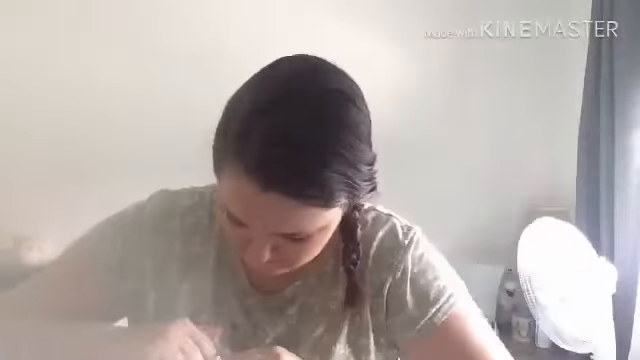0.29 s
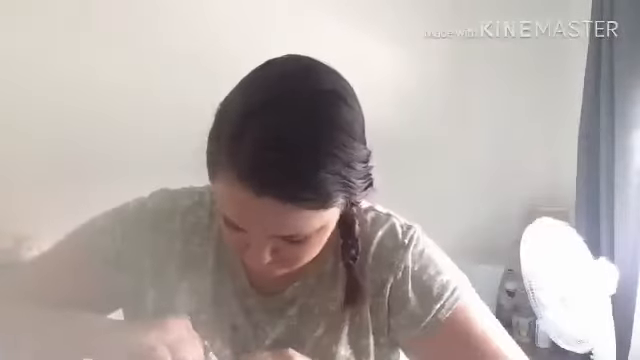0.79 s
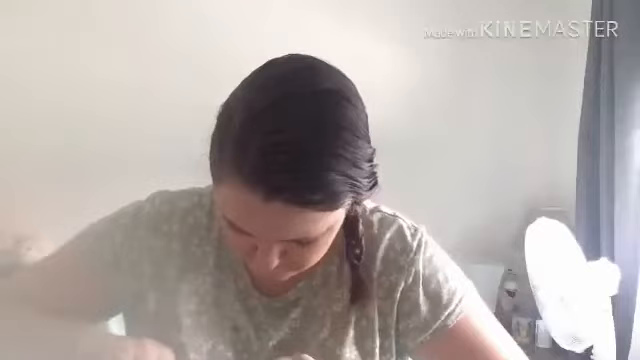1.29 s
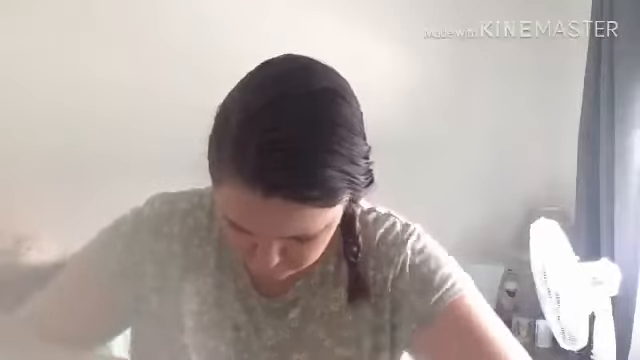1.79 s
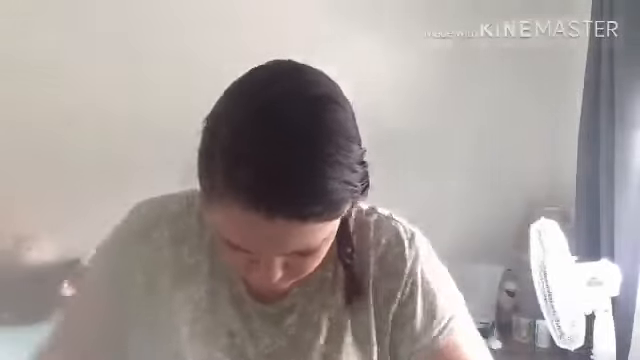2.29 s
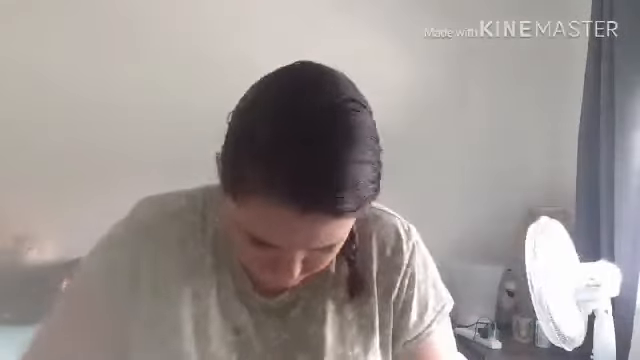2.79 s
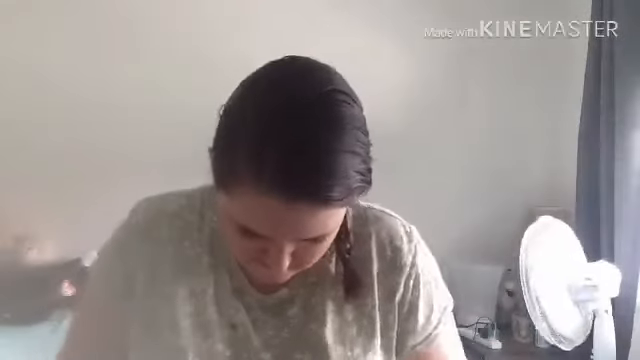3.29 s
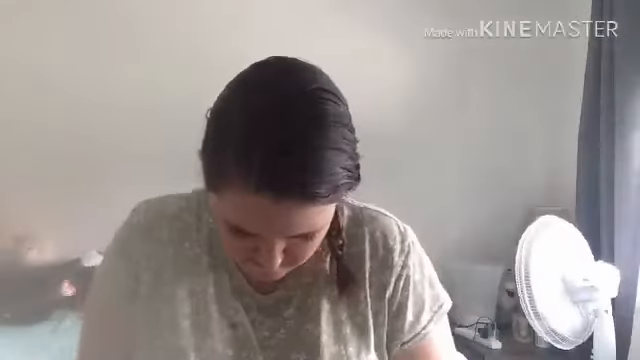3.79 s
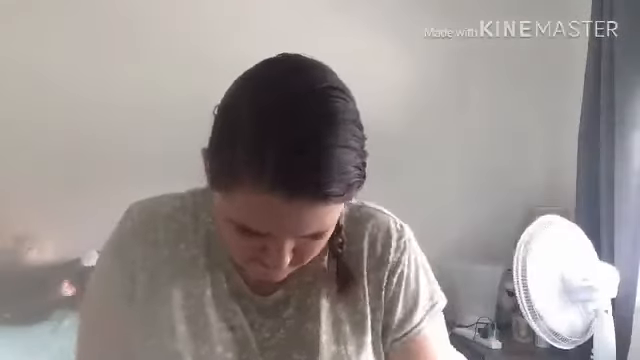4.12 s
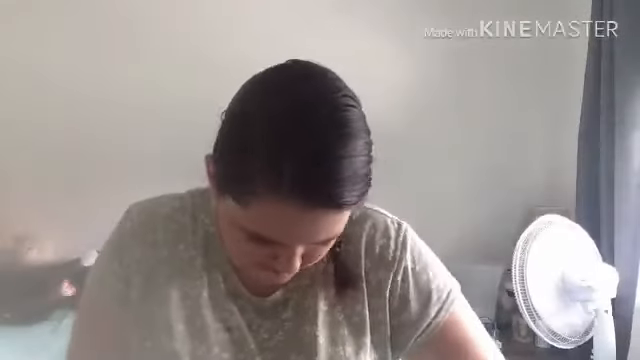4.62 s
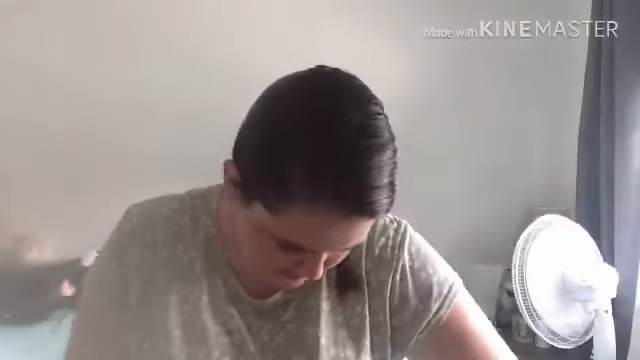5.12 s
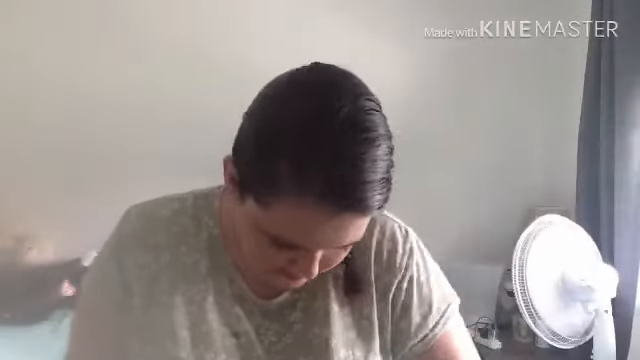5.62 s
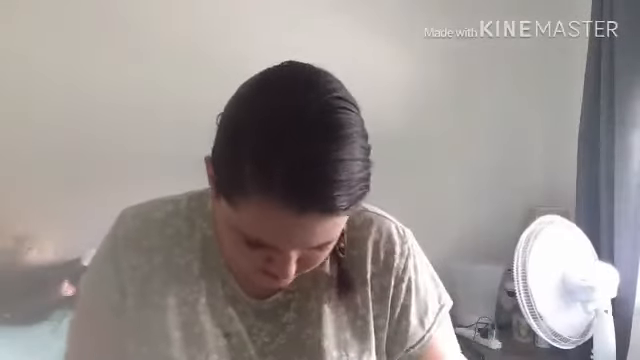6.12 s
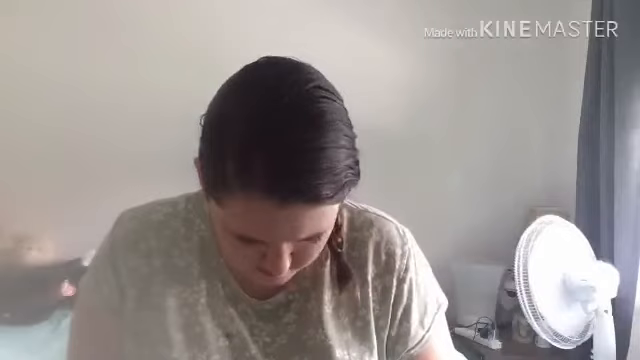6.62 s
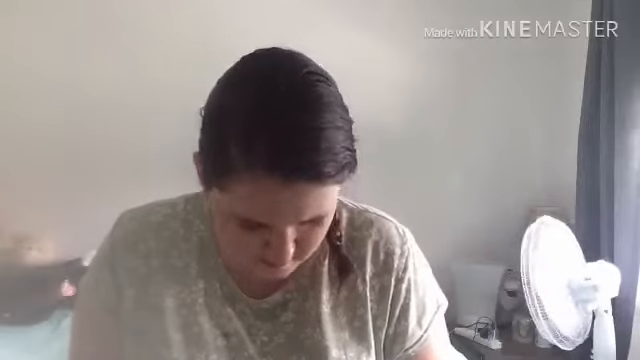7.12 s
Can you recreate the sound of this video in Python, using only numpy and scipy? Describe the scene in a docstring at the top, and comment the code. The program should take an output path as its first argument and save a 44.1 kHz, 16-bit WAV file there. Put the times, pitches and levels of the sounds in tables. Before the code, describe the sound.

Thin plastic film crackles and slides under busy hands, pops loudly once, then rustles more softly while a fan hums quietly in a small room.

```python
"""Opening a plastic mailing bag

Hands work the bag open in a small, quiet room, with an oscillating fan humming in the background.
The film slides and crinkles: coloured noise and many tiny clicks that ring at the pitch of its facets.
Creases snap through as short cracks with a thump and a tick, and once the taut bag gives way
with a loud pop of decaying sines. Sparse reflections from near walls surround the bag."""
import sys
import numpy as np
from scipy import signal
from scipy.fft import rfft, irfft
from scipy.io import wavfile

SR = 44100
rng = np.random.default_rng(int(sys.argv[2]) if len(sys.argv) > 2 else 0)


def master_out(mix):
    """Clip the mix to full scale and print it as 16-bit PCM to the path in sys.argv[1]."""
    frames = np.transpose(np.atleast_2d(mix))
    ceiling = np.clip(frames, -1, 1)
    pcm = np.round(ceiling * 32767).astype(np.int16)
    wavfile.write(sys.argv[1], SR, pcm)


N = 326340

# Colours of the film, from broad panels to fine edges and the finest kinks.
# Each row: frequency in Hz, density in dB per Hz.
PANEL = [(60, -42), (130, -4.5), (230, -8), (350, -3), (500, -0.5), (650, 1.5), (800, -2), (1200, -47),
         (3000, -61)]
FILM = [(300, -17.5), (620, -0.5), (820, -5), (1120, 0), (1400, -4.5), (1650, -3), (1900, 0), (2150, -1.5),
        (2450, -4), (2700, -4.5), (2950, -1.5), (3400, -13.5), (5000, -15), (12000, -74)]
EDGE = [(1500, -23), (3300, 1.5), (4400, 0.5), (6000, 2), (7500, -1.5), (9000, -5.5), (12000, -6.5),
        (15500, -7), (16500, -29)]
PINPRICK = [(1500, -29), (5000, -14), (9000, 1.5), (14000, -1)]
# Crispness of the film as the bag is worked open.
# Each row: time in seconds, crinkle of the edges in dB relative to the effort.
CRISPNESS = [(0, -12), (0.8, -12), (0.97, -9), (1.35, -13.5), (2.0, -11), (2.4, -13), (3.05, -10.5),
             (3.21, -6.5), (3.4, -12), (3.7, -9), (4.5, -10.5), (5.3, -8.5), (6.2, -10), (6.9, -8),
             (7.17, -6.5), (7.4, -11.5)]
LEAD_S = 0.005  # length of the soft noise that swells up before each click, in seconds


def amp(db):
    """Amplitude factor of a level in dB."""
    return 10 ** (np.asarray(db) / 20)


def unit(x):
    """The signal scaled to rms 1."""
    return x / np.sqrt(np.mean(x ** 2) + 1e-20)


def read(points, hz):
    """A spectrum table, joined on a log-frequency axis."""
    f, value = np.transpose(points)
    return np.interp(np.log(hz + 1), np.log(f), value)


def follow(rows):
    """The columns of a curve table at every sample."""
    s, *columns = np.transpose(rows)
    return [np.interp(np.arange(N) / SR, s, c) for c in columns]


def add(mix, s, sound):
    """Lay a sound into the mix from s seconds on."""
    part = mix[max(round(s * SR), 0):][:len(sound)]
    part += sound[:len(part)]


def response(points, size=2048):
    """Causal (minimum-phase) impulse response with this colour, of energy 1."""
    log_gain = np.log(amp(read(points, np.fft.rfftfreq(size, 1 / SR))))
    cepstrum = irfft(log_gain)[:size // 2]
    cepstrum[1:] *= 2
    h = irfft(np.exp(rfft(cepstrum, size)))[:size // 2]
    return h / np.linalg.norm(h)


def colour(x, points):
    """Filter a sound to the colour of a spectrum table."""
    return signal.oaconvolve(x, response(points))[:len(x)]


def drift(per_s):
    """Smooth chance of rms 1, changing about per_s times a second."""
    hz = np.fft.rfftfreq(N, 1 / SR)
    smooth = np.exp(-(hz / per_s) ** 2)
    return unit(irfft(rfft(rng.standard_normal(N)) * smooth, N))


def fan():
    """The motor hums at the mains frequency and its octave over a soft rush of air."""
    # Hum as the fan swings. Each row: time in seconds, level at the mains frequency in dB,
    # level at its octave in dB.
    hum_levels = [(0, -58, -75), (2.4, -54.5, -66), (3.3, -54.5, -62), (3.7, -59, -62.5),
                  (4.25, -61.5, -58), (4.5, -53, -61.5), (5, -53, -59), (5.9, -55.5, -60.5),
                  (6.5, -50.5, -64), (6.8, -48.5, -68), (7.4, -49.5, -77)]
    # Colour of the moving air. Each row: frequency in Hz, density in dB per Hz.
    air_colour = [(25, -20), (45, 0), (80, 3), (105, 11.5), (135, 0), (250, -3.5), (520, -11.5), (650, 0),
                  (800, -7), (1100, -2.5), (2200, -10.5), (3400, -26.5), (6000, -25), (15000, -37)]
    mains_hz = 59.9
    mains_db, octave_db = follow(hum_levels)
    phase = 2 * np.pi * mains_hz * np.arange(N) / SR + 0.037 * drift(2.6)
    mains = amp(mains_db) * np.sin(phase)
    octave = amp(octave_db) * np.sin(2 * phase)
    hum = np.sqrt(2) * (mains + octave)  # the table holds rms levels
    hz = np.fft.rfftfreq(N, 1 / SR)
    air = unit(irfft(rfft(rng.standard_normal(N)) * amp(read(air_colour, hz)), N))
    return hum + amp(-56) * air * amp(0.26 * drift(1))


def room(x, first_s=0.0024, size=16384):
    """Sparse reflections from near walls, each band dying at its own speed."""
    # Decay of the room. Each row: frequency in Hz, time to fall by 60 dB in seconds.
    decay = [(150, 0.3), (2000, 0.14), (12000, 0.2)]
    taps = rng.choice([-1., 1.], size) * (rng.random(size) < 3000 / SR)  # about 3000 a second
    hz, t, z = signal.stft(taps, SR, nperseg=256)
    fading = amp(-60 * t / read(decay, hz)[:, None])
    tail = signal.istft(z * fading, SR, nperseg=256)[1]
    tail *= np.arange(len(tail)) / SR > first_s
    return signal.oaconvolve(x, tail / np.linalg.norm(tail))[:N]


def hands():
    """Strokes swell and fade, and overlap in power: gains of the film, its broad panels and its edges."""
    # Strokes over the bag. Each row: time of the height in seconds, effort in dB, swell in seconds,
    # fade in seconds, flapping of broad panels in dB relative to the effort.
    strokes = [(0.01, -47, .05, 0.094, -3.5), (0.19, -46.5, 0.097, 0.15, -4.5),
               (0.36, -45, 0.024, 0.096, -8), (0.61, -48.5, 0.12, 0.097, -10), (0.89, -48, 0.15, 0.47, -10),
               (1.09, -43.5, 0.062, .055, -4.5), (1.35, -46.5, 0.11, 0.071, -3.5),
               (1.48, -51.5, 0.084, 0.2, -7), (1.959, -42, 0.1, 0.074, -7), (2.1, -53, 0.11, 0.27, -4.5),
               (2.37, -51, 0.047, 0.19, -5), (2.698, -48.5, 0.028, 0.057, -2), (2.94, -42, 0.15, 0.11, -4),
               (3.25, -41, .06, 0.072, -1.5), (3.45, -51, 0.023, 0.2, 0), (3.62, -49, 0.17, 0.084, -8.5),
               (3.93, -46, 0.091, 0.081, -1), (4.26, -51.5, 0.22, 0.069, -1),
               (4.36, -47, 0.079, 0.045, -4.5), (4.56, -56.5, 0.29, 0.087, -0.5),
               (4.67, -51, .025, 0.056, 0), (4.95, -55, 0.31, 0.14, -4), (5.2, -55.5, 0.083, 0.11, -7),
               (5.54, -51.5, 0.18, 0.11, 2.5), (5.98, -49, .38, 0.36, -1.5), (6.16, -52, 0.092, 0.53, -7.5),
               (6.6, -57, 0.23, 0.044, 1), (6.85, -53, 0.15, 0.24, -6.5), (7.05, -58.5, 0.19, 0.15, -1)]
    stroke_db = 10  # a stroke gains this much during its swell and loses it again during its fade
    arch = 1.31  # above 1, a stroke has a rounder top and ends more steeply
    hold_db, hold_flap_db = -68.5, 2  # the bag stirs faintly while it is only held
    t = np.arange(N) / SR
    film = np.full(N, amp(hold_db) ** 2)
    panel = np.full(N, amp(hold_db + hold_flap_db) ** 2)
    for s, db, swell_s, fade_s, flap_db in strokes:
        near = slice(*np.searchsorted(t, [s - 3 * swell_s, s + 3 * fade_s]))
        away = np.maximum((s - t[near]) / swell_s, (t[near] - s) / fade_s)
        power = amp(db - stroke_db * away ** arch) ** 2
        film[near] += power
        panel[near] += power * amp(flap_db) ** 2
    crispness_db = follow(CRISPNESS)[0]
    return np.sqrt(film), np.sqrt(panel), np.sqrt(film) * amp(crispness_db)


def buckles(per_s, spread_db, size=4000):
    """Tiny bucklings of the film: clicks of either sign, many small and a few large."""
    when, chance, strength, side = rng.random((size, 4)).T
    height_db = -spread_db * np.log(np.maximum(strength, 0.04))  # the floor caps the largest
    height = amp(height_db) * np.sign(side - 0.5)
    happens = chance < per_s * N / SR / size
    return unit(np.bincount((when * N).astype(int), height * happens, N))


def facet(points, hz, width_hz, ring_db):
    """One facet of the film: the common colour with a resonance of its own standing out."""
    grid = np.geomspace(60, 18000, 240)
    peak = 1 / (1 + ((grid - hz) / (width_hz / 2)) ** 2)
    raised_db = 10 * np.log10(1 + amp(ring_db) ** 2 * peak)
    return np.transpose([grid, read(points, grid) + raised_db])


def rustle(count=18):
    """Facets of many sizes buckle in clumps over the hiss of film sliding on film."""
    film_gain, panel_gain, edge_gain = hands()
    clumps = amp(2.4 * drift(44))
    panel, film, edge = np.zeros((3, N))
    for k in range(count):
        smallness = (k + rng.random()) / count
        clicks = buckles(per_s=60, spread_db=5.0) * clumps
        pitch_hz = 950 * 2.773 ** smallness
        ringing = colour(clicks, facet(FILM, pitch_hz, width_hz=98, ring_db=17.5))
        film += amp(0.046 * read(FILM, pitch_hz)) * ringing
        # stiff edges tick by themselves, higher up
        edge_hz = 3100 * 3 ** smallness
        ticks = buckles(per_s=90, spread_db=4.7) * clumps
        ticking = colour(ticks, facet(EDGE, edge_hz, width_hz=260, ring_db=19))
        edge += amp(0.5 * read(EDGE, edge_hz)) * ticking
        if k % 2:  # every other facet drags a broad panel along
            panel_hz = rng.uniform(292, 673)
            panel += colour(clicks, facet(PANEL, panel_hz, width_hz=85, ring_db=9.5))
    slide = rng.standard_normal(N) * unit(amp(1.5 * drift(70)))
    pricks = colour(buckles(per_s=120, spread_db=4), PINPRICK)  # the finest kinks, each a single click
    panel = amp(-2.0) * unit(panel)
    film = amp(-0.8) * unit(film) + amp(-11.5) * colour(slide, FILM)
    edge = amp(-2.5) * unit(edge) + amp(-8) * colour(slide, EDGE) + amp(-9.5) * pricks
    return film_gain * film + panel_gain * panel + amp(0.57) * edge_gain * edge


def burst(settle_s, chatter, lead_db=-9, size=1600):
    """Noise that swells briefly, one sharp click, then noise dying away."""
    click = round(LEAD_S * SR)
    t = (np.arange(size) - click) / SR
    swelling = amp(lead_db) * (1 + t / LEAD_S)
    settling = np.exp(-abs(t) / settle_s)
    noise = rng.standard_normal(size) * np.where(t < 0, swelling, settling)
    return signal.unit_impulse(size, click) + chatter * noise / np.linalg.norm(noise)


def blow(drive, points, length_s=0.007):
    """A coloured blow with the energy of level 0 dB held for length_s."""
    sound = colour(drive, points)
    return sound * np.sqrt(length_s * SR) / np.linalg.norm(sound)


def creases():
    """Each crease ticks at its edge, cracks at the pitch of its facet and pushes the panel around it."""
    # Creases snapping through. Each row: time in seconds, level of the crack in dB,
    # pitch of the facet in Hz, thump of the panel in dB relative to the crack.
    snaps = [(0.4962, -49.5, 1490, -19), (0.5512, -47, 1060, -10), (0.908, -46, 1720, -26),
             (0.964, -36.5, 1200, -18), (1.039, -45, 2950, -18), (1.2344, -63, 1590, 4),
             (1.5251, -48, 1000, -10), (1.8737, -36, 1230, -16), (1.88, -40, 1080, -20),
             (1.8863, -45, 1110, -18), (1.893, -43, 2000, -7), (1.9132, -38, 1000, 3),
             (1.954, -32, 1100, -5), (2.696, -47.5, 1690, -5), (2.867, -38.5, 1520, -22),
             (2.9064, -38, 1210, -12), (2.911, -33.5, 1550, -7), (2.9488, -35.5, 2310, -2),
             (3.0609, -45, 1620, -19), (3.1488, -57, 2340, -6), (3.1729, -42, 1570, -18),
             (3.205, -44, 1520, -24), (3.2546, -32, 1350, 0), (3.258, -34, 1810, -13),
             (3.3266, -44.5, 1350, -17), (3.4223, -48.5, 1870, -3), (3.6725, -45.5, 1530, 2),
             (4.0104, -43.5, 2640, -8), (4.349, -42.5, 1400, -24), (4.373, -43.5, 1310, -23),
             (4.423, -49.5, 1550, -24), (4.5919, -44.5, 1180, -4), (4.6585, -55, 1650, -6),
             (4.9337, -48, 1490, 5.5), (4.9996, -52, 2300, 2), (5.152, -61, 1800, 7), (5.167, -58, 1800, 2),
             (5.1865, -47, 2140, 7), (5.199, -60, 1900, -2), (5.3432, -42.5, 2450, -7.5),
             (5.4385, -57.5, 1790, 6), (5.481, -43, 1680, -4), (5.649, -47, 2070, 0),
             (5.9716, -42.5, 1700, 1), (6.1461, -46.5, 1330, 6), (6.473, -49.5, 1840, -3),
             (6.672, -52, 1610, -20), (6.8483, -51, 1850, -11), (7.0421, -62, 1960, 7),
             (7.0634, -52, 1780, -16), (7.1735, -58, 2320, -15.5), (7.2778, -55, 1760, -15)]
    # the tick's level before crispness, at a firm crease; it grows little with force (dB per dB)
    tick_level_db, firm_db, tick_growth = -46, -50, 0.027
    panel_facet_hz = 1364  # facets that ring lower than this are large and lie in larger, deeper panels
    thin_db = 3  # a tick this far above its crack is half chatter, half single click
    out = np.zeros(N)
    for s, db, hz, thump_db in snaps:
        crispness_db = np.interp(s, *np.transpose(CRISPNESS))
        tick_db = tick_level_db + crispness_db + tick_growth * (db - firm_db) - db  # relative to the crack
        crack = blow(burst(settle_s=0.0024, chatter=1.4), facet(FILM, hz, width_hz=340, ring_db=14.5))
        # a harder push moves a wider, deeper panel: its colour shifts down by this factor
        depth = np.clip(amp(-0.24 * (db + thump_db + 41.0)) * hz / panel_facet_hz, 0.4, 1)
        thump = blow(burst(settle_s=0.0076, chatter=0.36), np.multiply(PANEL, [depth, 1]))
        tick = blow(burst(settle_s=0.0054, chatter=2.4), EDGE)
        prick = blow(burst(settle_s=0.00066, chatter=0.49), PINPRICK)
        fine = 1 / (1 + amp(thin_db - tick_db))  # nearer 1 the more the crease is all edge
        edge = np.sqrt(1 - fine) * tick + fine * prick
        snap = crack + amp(thump_db) * thump + amp(tick_db) * edge
        add(out, s - LEAD_S, amp(db) * snap)
    return out


def pop(size=2200):
    """The stretched bag lets go twice in quick succession, rings briefly and crackles as it slackens."""
    # Releases of the taut bag. Each row: time in seconds, level in dB.
    releases = [(1.093, -7.5), (1.0947, -24)]
    # Ring of the taut bag. Each row: frequency in Hz, level in dB relative to the release,
    # time to fall by 60 dB in seconds.
    modes = [(1114, -3, 0.02), (1900, 2, 0.0036), (2400, -3, 0.012), (6240, -26, 0.013)]
    t, out = np.arange(size) / SR, np.zeros(N)
    ring = np.zeros(size)
    for k, (hz, db, t60) in enumerate(modes):
        sign = (-1) ** k  # neighbouring modes start in opposite directions
        ring += sign * amp(db - 60 * t / t60) * np.sin(2 * np.pi * hz * t)
    for s, db in releases:
        tick = amp(-30.5) * blow(burst(settle_s=0.0016, chatter=1.0), EDGE)
        push = amp(-26.5) * blow(burst(settle_s=0.0052, chatter=0.5), PANEL)
        crackle = amp(-22.0) * blow(burst(settle_s=0.0088, chatter=3), FILM)
        add(out, s, amp(db) * ring)
        add(out, s - LEAD_S, amp(db) * (tick + push + crackle))
    return out


def scene():
    """The bag heard directly and off the walls, with the fan behind it."""
    handling, snaps, burst_open = rustle(), creases(), pop()
    reflected = room(amp(-9.0) * handling + amp(-6.5) * snaps + amp(-12.0) * burst_open)
    return (handling + snaps + burst_open + reflected + fan())[None]


def record(dry):
    """The recorder's band limit: a steep low-pass."""
    cutoff_hz = 16000
    band = signal.firwin(401, cutoff_hz, window=("kaiser", 8), fs=SR)
    return signal.oaconvolve(dry, band[None], "same")


dry = scene()
out = record(dry)
master_out(out)
```